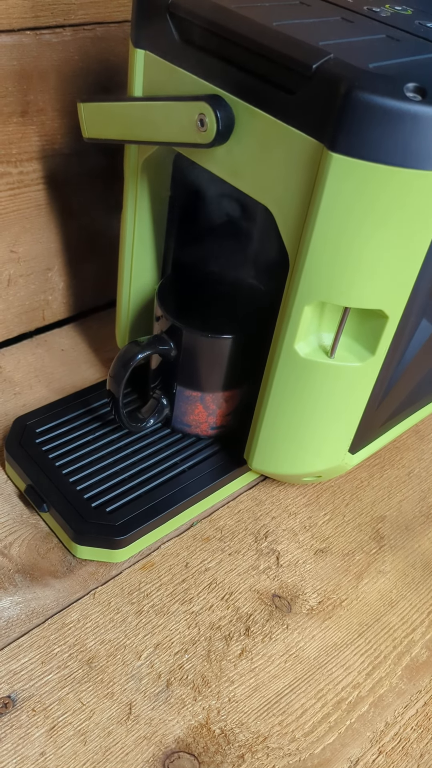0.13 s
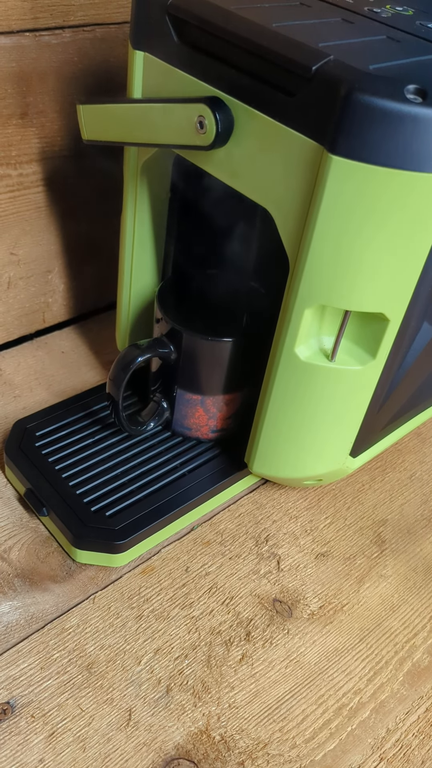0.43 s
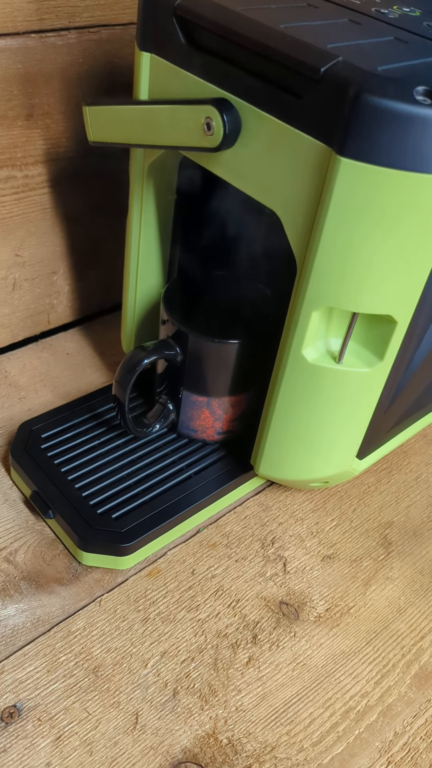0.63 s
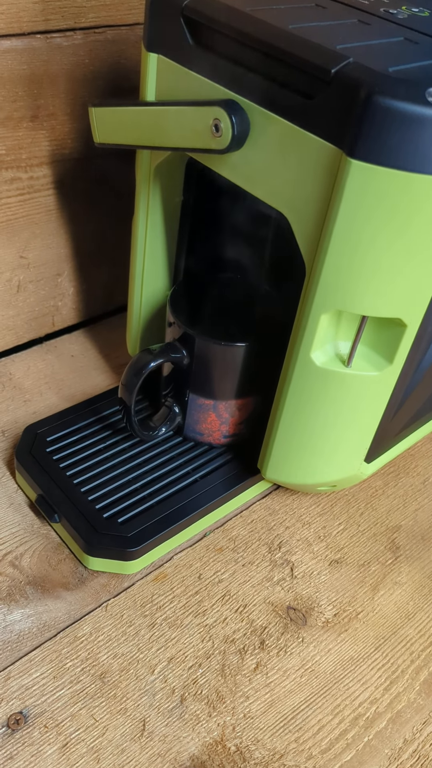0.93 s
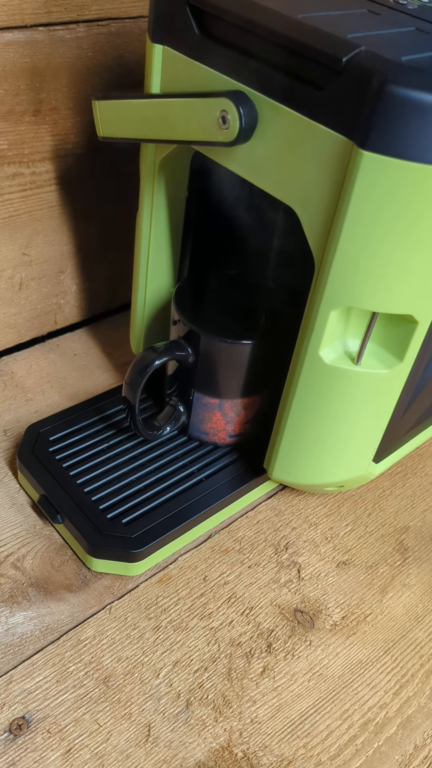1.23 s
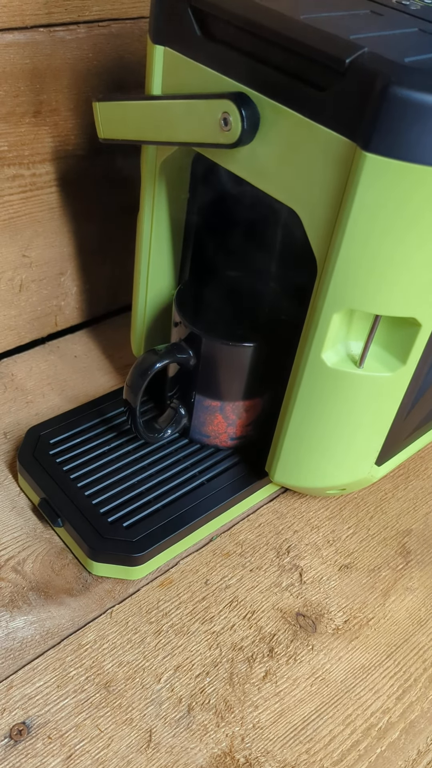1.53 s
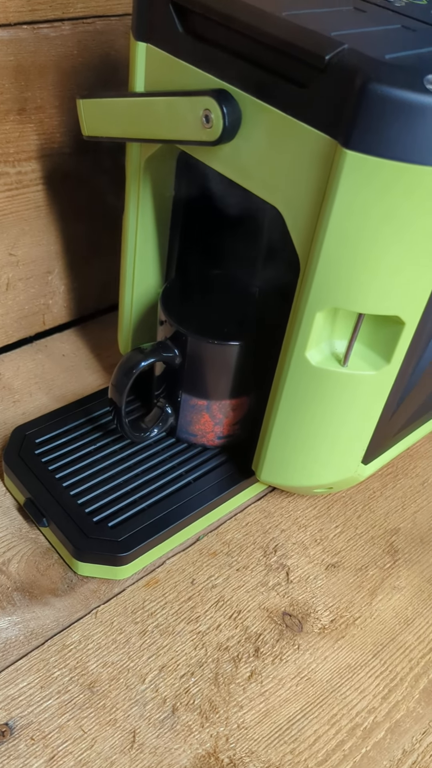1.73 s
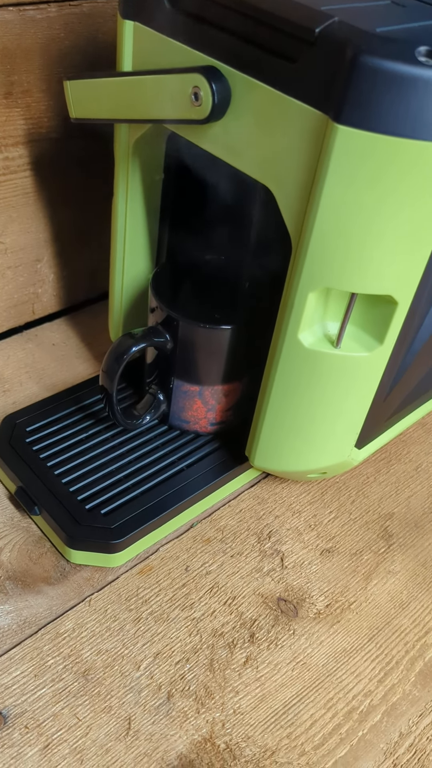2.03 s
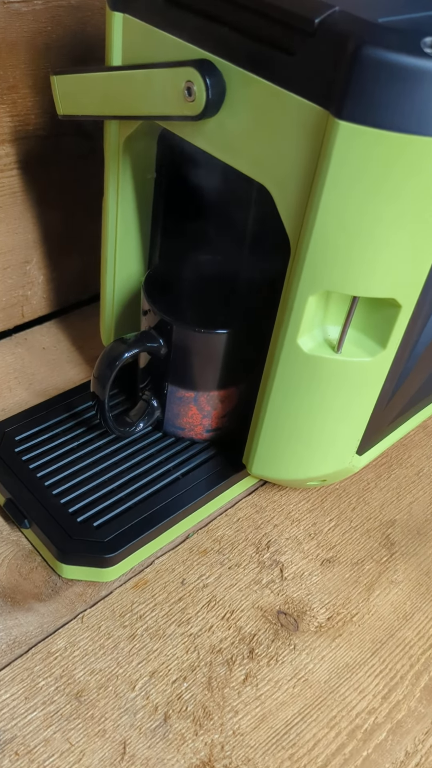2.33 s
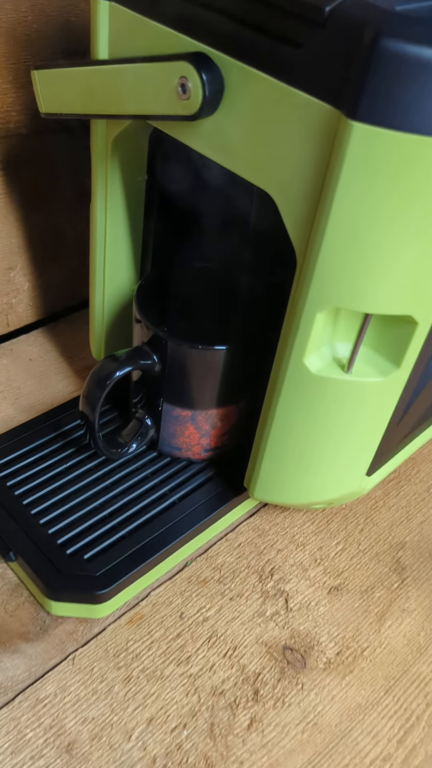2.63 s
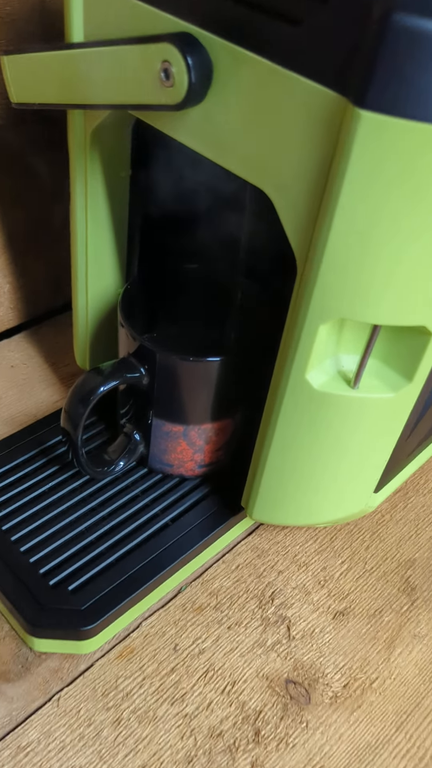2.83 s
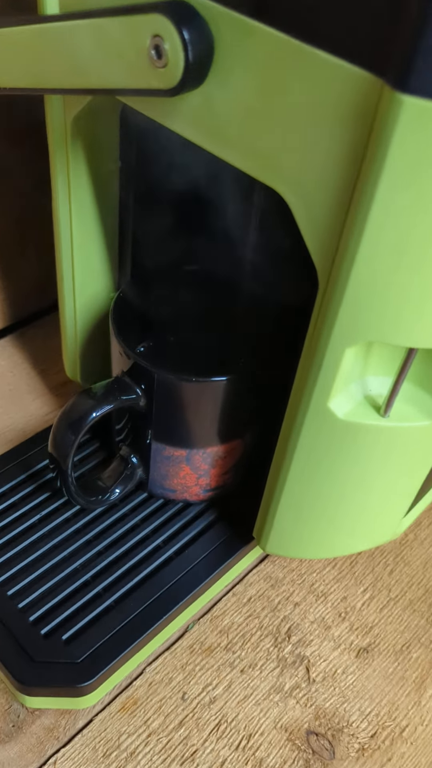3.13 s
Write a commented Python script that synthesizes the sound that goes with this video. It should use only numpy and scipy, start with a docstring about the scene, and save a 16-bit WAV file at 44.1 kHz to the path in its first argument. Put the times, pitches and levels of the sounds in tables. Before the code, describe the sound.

Coffee drips into a mug throughout, in small, close, irregular plops over a faint trickle, with the loudest drop at about 3.2 seconds. The coffee machine's outlet spits and fizzes finely above a steady low hum, quiet room air and a very faint, thin steam whistle. Froth sizzles faintly around 1.2 seconds, and a soft puff of steam builds from 2.1 seconds and stops by 2.5.

```python
"""A quiet room, with a stereo microphone close to a small coffee machine as it finishes brewing.
Room air, a mains buzz and the hum of a motor lie at the back. Steam whistles thinly through a narrow
gap and escapes in a soft puff, and froth sizzles briefly. Up front, bubbles burst at the wet outlet in
spits and fizz, and drops plop into the mug, each trapping a bubble that rings for a few cycles."""
import sys
import numpy as np
from scipy import signal
from scipy.fft import rfft, irfft
from scipy.io import wavfile
from scipy.ndimage import uniform_filter1d

SR = 44100
rng = np.random.default_rng(int(sys.argv[2]) if len(sys.argv) > 2 else 0)


def wav_record(signal):
    """Record a signal, one row per channel, as 16-bit PCM in the file named by sys.argv[1]."""
    frames = np.transpose(np.atleast_2d(signal))
    bounded = np.clip(frames, -1, 1)
    # unit amplitude maps onto the largest positive 16-bit level
    quanta = np.round(bounded * 32767).astype(np.int16)
    wavfile.write(sys.argv[1], SR, quanta)


N = 145089


def amp(db):
    """Decibels to gain."""
    return 10 ** (np.asarray(db) / 20)


def unit(x):
    """Scales to rms 1."""
    return x / np.sqrt(np.mean(x ** 2) + 1e-20)


def curve_at(points, hz):
    """Reads a curve on a log-frequency axis."""
    f, value = np.transpose(points)
    return np.interp(np.log(hz + 1), np.log(f + 1), value)


def fader(levels):
    """Gain at each sample, from (time [s], level [dB]) points."""
    return amp(np.interp(np.arange(N) / SR, *np.transpose(levels)))


def add(mix, start_s, sound):
    """Mixes a stereo sound in at start_s."""
    part = mix[:, max(round(start_s * SR), 0):][:, :sound.shape[-1]]
    part += sound[..., :part.shape[1]]


# Room tone and simmer around the microphone (frequency [Hz], relative level [dB])
AIR_COLOUR = [(20, -55), (30, -40), (42, -17), (60, -1), (110, -2), (150, -4), (215, 3.9), (275, -4),
              (350, -1), (680, -8), (1000, -5), (1550, -6), (1900, -10), (2700, -13), (4150, -22),
              (4950, -22), (5900, -28), (8200, -27), (10000, -33), (12000, -30), (15500, -30)]
# How alike that air is on the left and right (frequency [Hz], coherence [0-1])
AIR_COHERENCE = [(100, 0.83), (210, 0.96), (420, 0.25), (800, 0.37), (1400, 0.14), (12000, 0.19)]
def room_air(level_db=-42.5, patch_db=1.4):
    """Room noise and the faint simmer of the boiler, with small drifting patches in the spectrum."""
    hz = np.fft.rfftfreq(2048, 1 / SR)
    a, b, c, d, patches = rng.standard_normal((N // 512 + 5, len(hz), 5)).T
    patches = unit(uniform_filter1d(uniform_filter1d(patches, size=30, axis=0), size=4, axis=1))
    coherence = curve_at(AIR_COHERENCE, hz)[:, None]
    left = a + 1j * b
    right = coherence * left + np.sqrt(1 - coherence ** 2) * (c + 1j * d)
    spectra = np.array([left, right]) * amp(curve_at(AIR_COLOUR, hz)[:, None] + patch_db * patches)
    return amp(level_db) * unit(signal.istft(spectra, nperseg=2048, noverlap=1536)[1][:, :N])


# Mains buzz under the brewing (harmonic [number], level [dB])
MAINS_HARMONICS = [(2, -48.5), (3, -58.5), (4, -56.5), (5, -66.5), (6, -58.5), (7, -65), (8, -62),
                   (9, -61.5), (10, -50.5), (12, -59), (13, -59), (15, -59), (18, -62)]
# Tones of the motor (frequency [Hz])
MOTOR_TONES = [93.8, 111.15, 187.6, 222.3]
# The same tones at the microphone (level [dB])
MOTOR_LEVELS = [-57.5, -54, -51.5, -40.5]
def hum(mains_hz=59.98, wide_hz=590):
    """Mains and motor tones waver slightly; the higher ones differ more in phase between the sides."""
    t, out = np.arange(N) / SR, np.zeros((2, N))
    buzz = [(k * mains_hz, db) for k, db in MAINS_HARMONICS]
    for hz, db in buzz + list(zip(MOTOR_TONES, MOTOR_LEVELS)):
        waver = 1 + 0.065 * np.interp(t, np.linspace(0, t[-1], 20), rng.standard_normal(20))
        apart = np.pi / 4 * min((hz / wide_hz) ** 2, 1) * rng.choice([-1, 1]) * np.array([[1], [-1]])
        out += np.sqrt(2) * amp(db) * waver * np.sin(2 * np.pi * (hz * t + rng.random()) + apart)
    return out


def resonant_noise(centre_hz, half_width_hz):
    """Stereo noise in one resonance, at rms 1."""
    hz = np.fft.rfftfreq(N, 1 / SR)
    noise = rfft(rng.standard_normal((2, N)))
    return unit(irfft(noise / (1 + ((hz - centre_hz) / half_width_hz) ** 2), N))


# Thin whistle, faint at the microphone (time [s], level [dB])
WHISTLE_LEVELS = [(0, -59), (.42, -59.5), (.7, -72), (1.0, -59.5), (3.29, -61)]
def whistle():
    """Steam whistles through a narrow gap."""
    return resonant_noise(centre_hz=4570, half_width_hz=91) * fader(WHISTLE_LEVELS)


# Froth, faint at the microphone (time [s], level [dB])
SIZZLE_LEVELS = [(.9, -82), (1.05, -62), (1.22, -57.5), (1.33, -60.5), (1.65, -79)]
def sizzle():
    """Froth sizzles briefly, high in the treble."""
    return resonant_noise(centre_hz=13000, half_width_hz=1600) * fader(SIZZLE_LEVELS)


# Where the outlet sits in the stereo image (frequency [Hz], left minus right [dB])
OUTLET_BALANCE = [(3000, -4), (5200, 0), (8500, -3), (12000, -4), (14500, 10)]
def from_outlet(x, colour):
    """Colours a sound from the outlet and leans each band left or right."""
    hz = np.fft.rfftfreq(x.shape[-1], 1 / SR)
    balance = amp(np.outer([.5, -.5], curve_at(OUTLET_BALANCE, hz)))
    return irfft(rfft(x) * unit(amp(curve_at(colour, hz))) * balance, x.shape[-1])


# Puff of steam at the outlet (time [s], level [dB])
STEAM_LEVELS = [(2.03, -78), (2.1, -56), (2.25, -49.5), (2.38, -42), (2.43, -53), (2.5, -77)]
# Its hiss from close by (frequency [Hz], relative level [dB])
STEAM_SPECTRUM = [(400, 1.5), (2200, 8), (4600, 2.5), (5900, 2), (8200, 3), (10200, -1.5), (14400, 0),
                  (16000, -17)]
def steam():
    """Escaping steam builds to a soft hiss and stops."""
    return from_outlet(rng.standard_normal((2, N)) * fader(STEAM_LEVELS), STEAM_SPECTRUM)


# Reverberation of the room around the machine (frequency [Hz], time to fall 60 dB [s])
ROOM_DECAY = [(500, 0.17), (3000, 0.51), (14000, 0.034)]
def room(x, recess_db, tail_db, recess_t60=0.061):
    """Adds quick echoes from the machine's recess and a faint room tail."""
    t = np.arange(SR // 2) / SR
    recess, tail = rng.standard_normal((2, 2, len(t))) * (t > .0015)
    recess = recess * amp(-60 * t / recess_t60)
    hz, frame_s, spectra = signal.stft(tail, SR, nperseg=256)
    decay = amp(-60 * frame_s / curve_at(ROOM_DECAY, hz)[:, None])
    tail = signal.istft(spectra * decay, SR, nperseg=256)[1][:, :len(t)]
    echoes = (amp(recess_db) * unit(recess) + amp(tail_db) * unit(tail)) / np.sqrt(len(t))
    return x + signal.fftconvolve(x, echoes, axes=1)[:, :N]


def bubble(hz, rise_s, t60, glide_per_s=0):
    """A ringing bubble: a dying complex tone of peak 1 with a soft start; its pitch may rise."""
    t = np.arange(SR // 16) / SR
    envelope = (1 - np.exp(-t / rise_s)) ** 2 * amp(-60 * t / t60)
    return envelope / envelope.max() * np.exp(2j * np.pi * hz * (t + glide_per_s * t * t / 2))


# Spray at the outlet, from close by (frequency [Hz], relative level [dB])
SPIT_SPECTRUM = [(500, -27), (2000, 4.5), (3350, 3), (4100, -0.5), (5100, 4), (5800, -3.5), (6700, 1.5),
                 (8400, 1.5), (10200, -1.5), (12000, 3), (14600, 0), (16000, -5.5)]
def spit(db, burst_hz, rise_s=0.0013, half_width_hz=760, trim_db=-4):
    """A film of coffee bursts: a few milliseconds of spray, ringing around one pitch."""
    age = np.arange(SR // 50) / SR / rise_s
    hz = np.fft.rfftfreq(len(age), 1 / SR)
    resonance_db = 10 / (1 + ((hz - burst_hz) / half_width_hz) ** 2)
    spray = irfft(np.exp(2j * np.pi * rng.random((2, len(hz)))) * amp(resonance_db), len(age))
    return amp(db + trim_db) * unit(from_outlet(spray, SPIT_SPECTRUM)) * age * np.exp(1 - age)


# Bubbles bursting at the outlet, near the microphone (time [s], relative level [dB], pitch [Hz])
OUTLET_SPITS = [(0.3182, -35.5, 11800), (0.4347, -31, 11800), (0.589, -33.5, 12900), (0.6474, -32.5, 12900),
                (0.6808, -35, 11600), (0.7588, -34, 14500), (1.0144, -32.5, 12500), (1.259, -29.5, 11900),
                (1.2859, -27.5, 11700), (1.7716, -29.5, 7840), (1.8483, -36, 14100), (1.916, -32, 6800),
                (2.4846, -29, 12900), (2.6297, -35.5, 14400), (2.7576, -33.5, 14100), (2.9103, -43, 13500),
                (2.9213, -30, 14200), (2.9583, -31.5, 14700), (3.009, -31.5, 15000), (3.2227, -26.5, 9450),
                (3.271, -25.5, 13400)]
# Tiny, clear bubbles, a little right of centre (time [s], level [dB], pitch [Hz])
OUTLET_PINGS = [(0.519, -39.5, 5280), (0.589, -40, 5240), (1.327, -38.5, 5080), (1.917, -32.5, 5180),
                (2.058, -40, 3380), (2.805, -29.5, 3300), (3.275, -31, 5300)]
def sputter(fizz_per_s=14, fizz_low_hz=7100, fizz_high_hz=14800):
    """Bubbles at the wet outlet spit, fizz finely and now and then ring."""
    out = np.zeros((2, N))
    for start_s, db, hz in OUTLET_SPITS:
        add(out, start_s, spit(db, hz))
    for when, size, pitch in rng.random((int(fizz_per_s * N / SR), 3)):
        db = -44.5 + 3.5 * min(-np.log(size), 2.5)  # mostly faint, a few louder
        add(out, when * N / SR, spit(db, fizz_low_hz + (fizz_high_hz - fizz_low_hz) * pitch))
    for start_s, db, hz in OUTLET_PINGS:
        ping = bubble(hz, rise_s=0.00014, t60=.012, glide_per_s=3).imag
        add(out, start_s, amp(db) * ping * amp([[-2], [2]]))
    return room(out, recess_db=-15.5, tail_db=-8.5)


# Reflections off the walls nearest the drops (delay [s], relative level [dB])
WALL_ECHOES = [(.002, -7), (.0087, -15)]
def plop(db, hz, trim_db=2.5, right_db=-6, right_lag_rad=1.8):
    """A drop traps a bubble that rings for a few cycles; near walls repeat it."""
    tone = bubble(hz, rise_s=.001, t60=.011)
    right = tone * amp(right_db) * np.exp(-1j * right_lag_rad)
    direct = amp(db + trim_db) * np.array([tone, right]).real
    out = direct.copy()
    for delay_s, echo_db in WALL_ECHOES:
        add(out, delay_s, amp(echo_db) * direct)
    return out


# Drops landing in the mug, close and to the left (time [s], relative level [dB], bubble pitch [Hz])
MUG_DROPS = [(0.1101, -31, 1130), (0.191, -34, 1560), (0.4975, -31.5, 1480), (0.5472, -24, 1030),
             (0.5894, -29, 1600), (0.648, -25, 1400), (0.9259, -31.5, 1540), (0.9993, -29.5, 1510),
             (1.044, -25, 1360), (1.1962, -33.5, 1020), (1.2296, -29.5, 1050), (1.261, -23, 1540),
             (1.2864, -26, 1270), (1.704, -33, 1490), (1.7732, -26.5, 1490), (1.8898, -29, 1030),
             (1.9337, -28.5, 1120), (2.1037, -26.5, 1190), (2.293, -29, 1510), (2.485, -25, 1160),
             (2.503, -26.5, 1066), (2.83, -28, 1135), (2.9912, -28, 970), (3.0103, -23.5, 1005),
             (3.134, -28.5, 1400), (3.2233, -17.5, 1560)]
def drips(trickle_per_s=16, trickle_low_hz=950, trickle_high_hz=1650):
    """Single drops fall into the mug over a faint trickle of small ones."""
    out = np.zeros((2, N))
    for start_s, db, hz in MUG_DROPS:
        add(out, start_s, plop(db, hz))
    for when, size, pitch in rng.random((int(trickle_per_s * N / SR), 3)):
        db = -39 + 2.5 * (2 * size - 1)
        hz = trickle_low_hz + (trickle_high_hz - trickle_low_hz) * np.sqrt(pitch)
        add(out, when * N / SR, plop(db, hz))
    return room(out, recess_db=-12, tail_db=-16)


def scene():
    """The brewing machine, from the room behind it to the mug in front."""
    return room_air() + hum() + whistle() + sizzle() + steam() + sputter() + drips()


def record(dry, cutoff_hz=15850):
    """The recorder's band limit."""
    lowpass = signal.firwin(511, cutoff_hz, window=("kaiser", 9), fs=SR)
    return signal.oaconvolve(dry, lowpass[None], "same")


dry = scene()
out = record(dry)
wav_record(out)
```